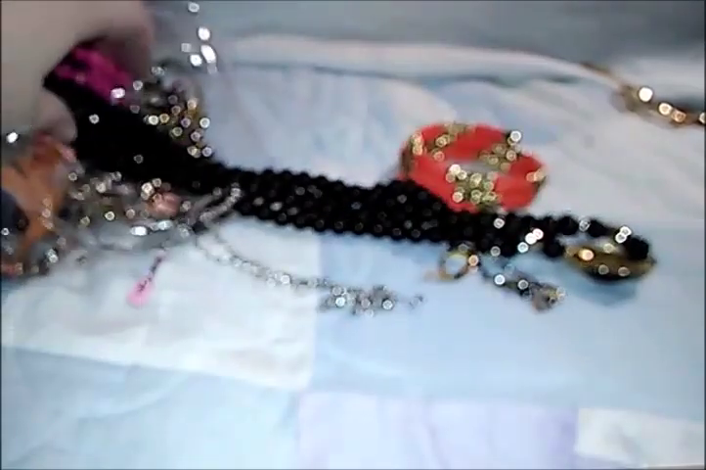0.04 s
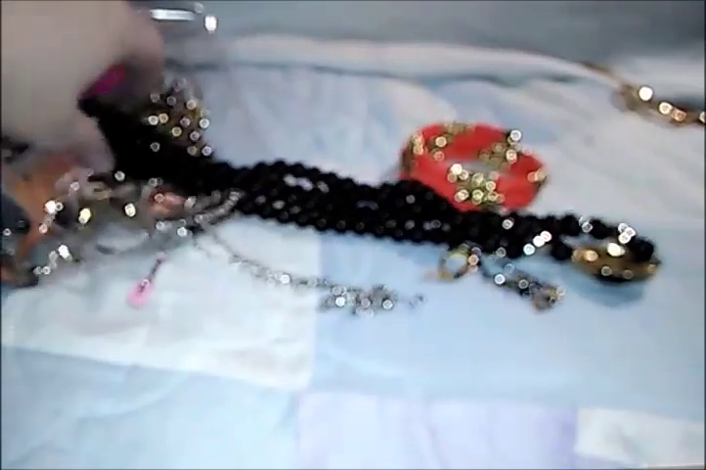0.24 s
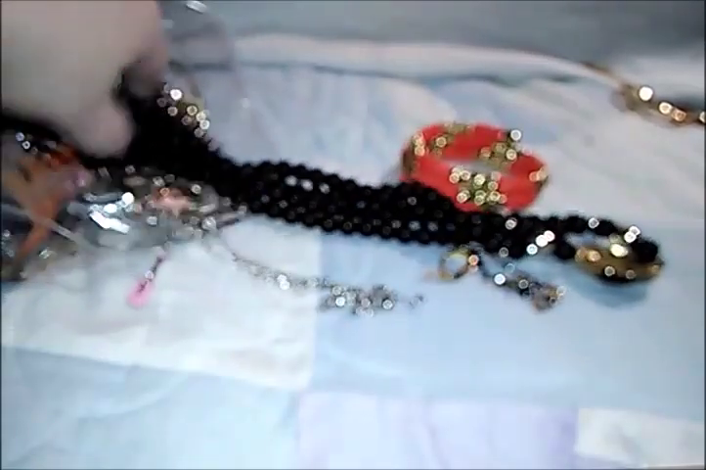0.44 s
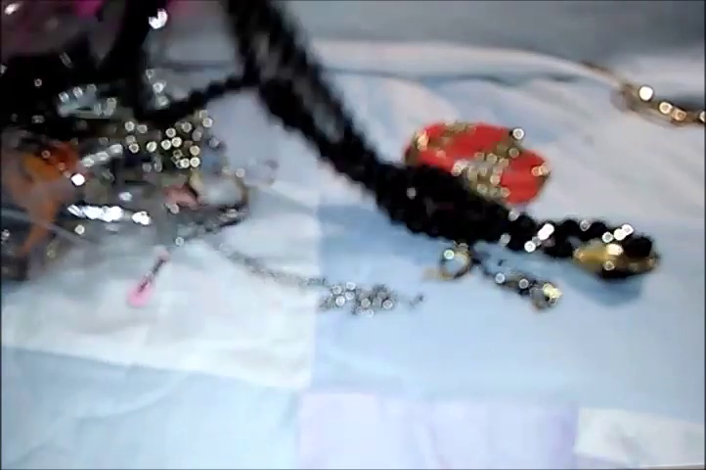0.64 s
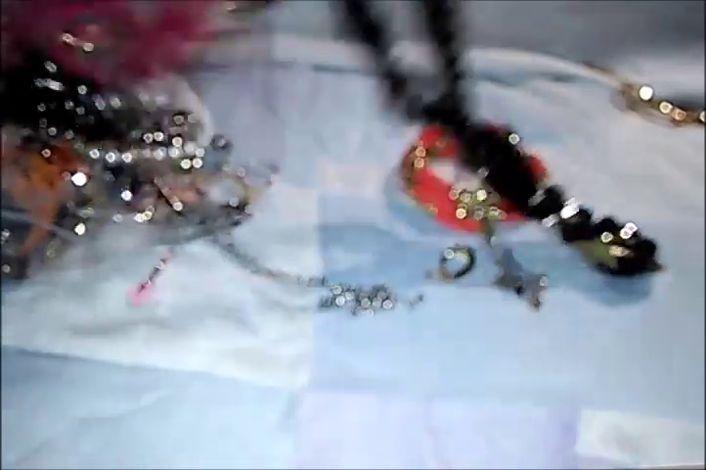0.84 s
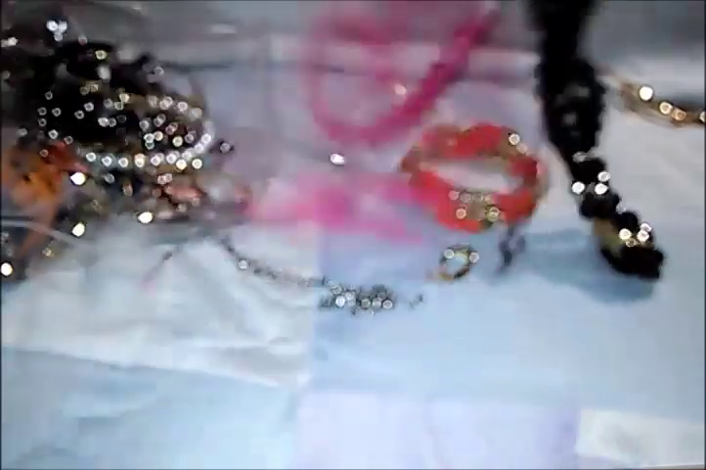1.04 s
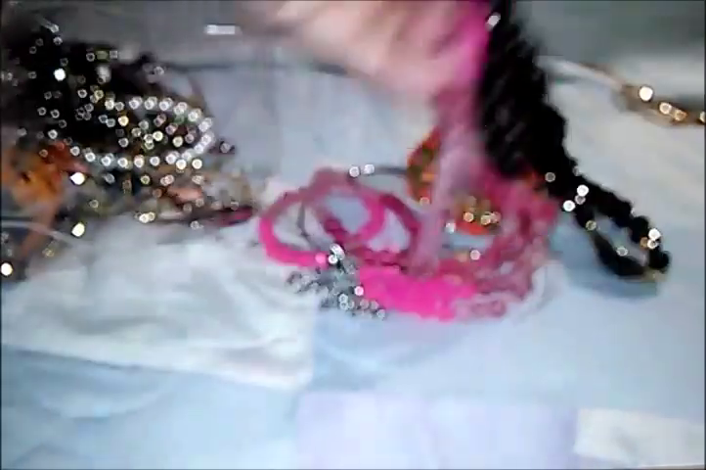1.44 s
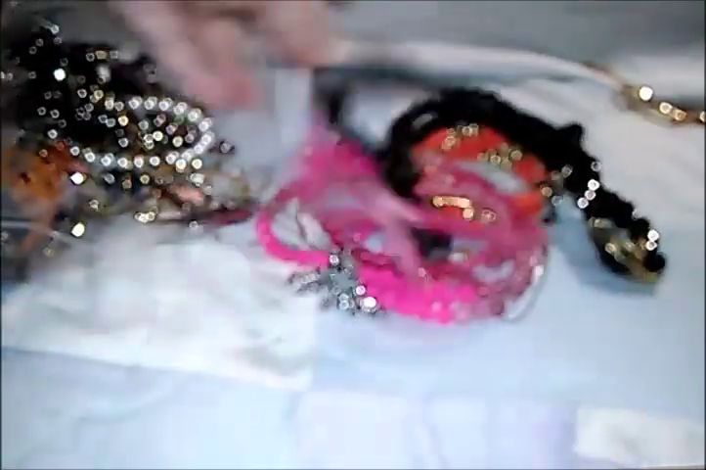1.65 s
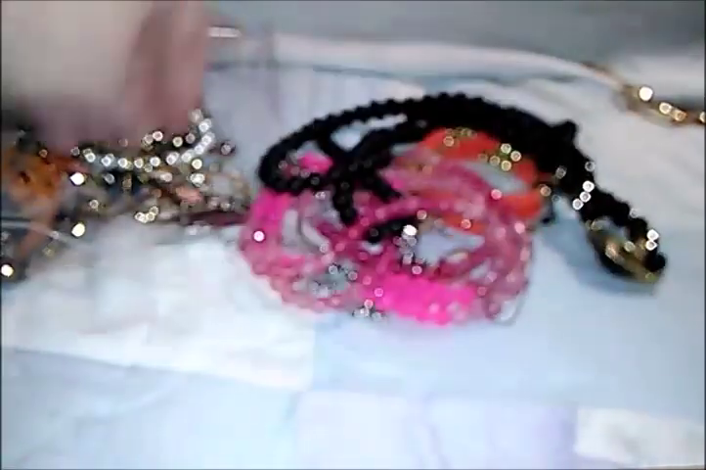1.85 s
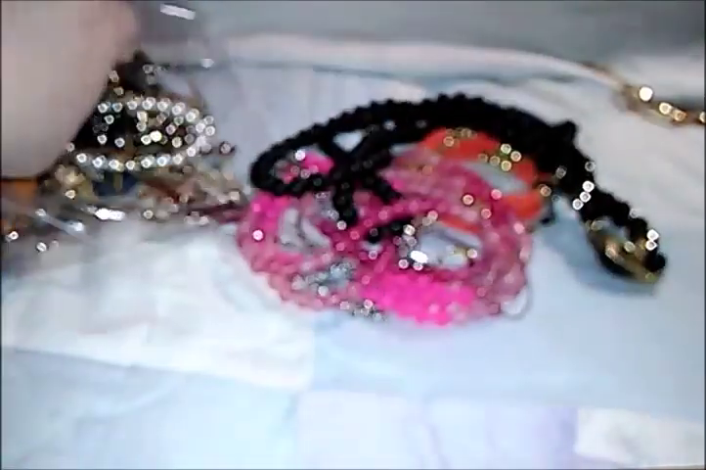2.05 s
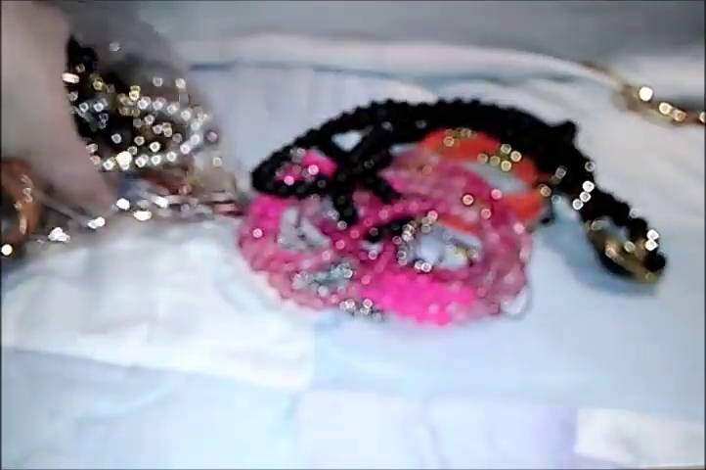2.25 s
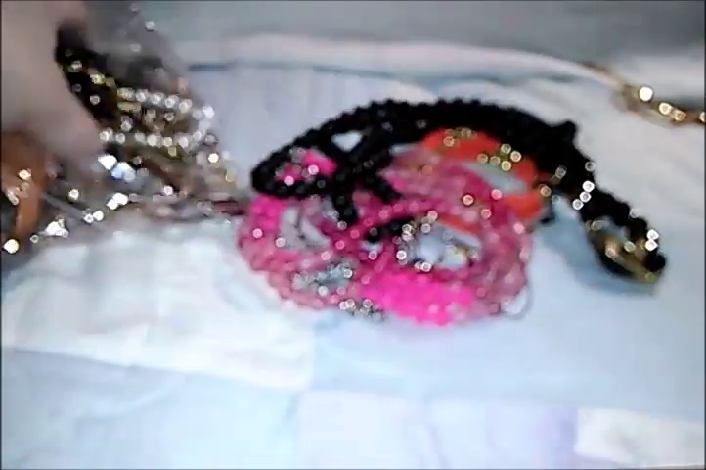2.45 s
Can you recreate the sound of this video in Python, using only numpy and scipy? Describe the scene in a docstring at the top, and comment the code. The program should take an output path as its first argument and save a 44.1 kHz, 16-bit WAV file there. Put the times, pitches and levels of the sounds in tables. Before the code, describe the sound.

Bead necklaces rattle brightly and close by, starting with a bangle clack and scraping over a pile and cloth. The rattle builds to its loudest near 0.9 seconds, then thins into single clicks and small metal pings. It swells again around 1.7 seconds and briefly drops. From about 1.8 to 2.2 seconds soft thumps sound as the strands settle, with rattling and clacks until 2.5 seconds. A faint room hum lies underneath.

```python
"""A bright rattle of beads, close by: necklaces and bracelets are dragged from a pile, lifted, and
lowered onto cloth. The rattle is thousands of tiny touches between beads, each ringing for an instant.
Single beads click, bangles clack and small metal parts ping. Underneath, the strands scrape over the
pile and the cloth, and the padded surface thumps softly, in a quiet room with a low hum."""
import sys
import numpy as np
from scipy import signal
from scipy.fft import rfft, irfft, next_fast_len
from scipy.io import wavfile

SR = 44100
rng = np.random.default_rng(int(sys.argv[2]) if len(sys.argv) > 2 else 0)


def persist_wave(psi):
    """Save psi, clipped to +-1, as 16-bit WAV."""
    counts = np.round(np.clip(psi, -1, 1) * 32767).astype(np.int16)
    wavfile.write(sys.argv[1], SR, np.atleast_2d(counts).T)


N = 110250  # 2.5 seconds


def undb(db):
    """Turn decibels (dB) into a number to multiply a sound by."""
    return 10 ** (np.asarray(db) / 20)


def curve(table, t):
    """Read a table at times t, joining its rows with straight lines."""
    return np.interp(t, *np.array(table).T)


def unit(x):
    """Scale a sound so that its average level (rms) is 1."""
    return x / np.sqrt(np.mean(x ** 2))


def colour(x, tone):
    """Make some pitches louder and others softer, following a table of Hz and dB."""
    size = next_fast_len(N + N // 4) * 2
    hz, db = np.array(tone).T
    freqs = np.maximum(np.fft.rfftfreq(size, 1 / SR), 1)
    gain = undb(np.interp(np.log(freqs), np.log(hz), db))
    # shape the filter so that it never rings before a hit
    cepstrum = irfft(np.log(gain))
    cepstrum[1:size // 2] *= 2
    cepstrum[size // 2 + 1:] = 0
    return irfft(rfft(x, size) * np.exp(rfft(cepstrum)))[:N]


def rings(times, sizes, hz, t60, samples):
    """Each touch starts a tone that dies away; t60 is the seconds it takes to fade by 60 dB."""
    age = np.arange(samples) / SR
    times, sizes, hz, t60 = (v[:, None] for v in np.broadcast_arrays(times, sizes, hz, t60))
    waves = sizes * np.cos(2 * np.pi * hz * age) * np.exp(-np.log(1000) * age / t60)
    waves[:, 0] *= .5
    positions = np.maximum(times * SR, 0).astype(int) + np.arange(samples)
    return np.bincount(positions.ravel(), waves.ravel(), N)[:N]


def contacts(per_s, scatter_db=5.5, count=26000):
    """Random touches: each gets a time, a size, a random number around 0 and another from 0 to 1."""
    even, normal = rng.random((count, 2)), rng.standard_normal((count, 2))
    n = int(min(per_s * N / SR, count))
    times = even[:n, 0] * N / SR
    sizes = undb(scatter_db * np.minimum(normal[:n, 0], 2))
    return times, sizes, normal[:n, 1], even[:n, 1]


def flurries(times, slips_per_s=55, fade_db=8.5, count=400):
    """Strands catch and slip: touches are strongest just after a slip and fade until the next."""
    slips = np.cumsum(rng.gamma(2, .5, count)) / slips_per_s
    progress = np.interp(times, slips, np.arange(count)) % 1
    return undb(-fade_db * progress)


# The room's hum. Each row: pitch in Hz, average level in dB.
HUM_TONES = [(76, -74.5), (227, -70.5)]
# A faint whir that fades and returns. Each row: time in seconds, level in dB.
WHIR_LEVEL = [(.4, -70.5), (1.1, -60.5), (1.25, -84), (1.55, -66.5), (1.75, -63.5)]
# The tone of the room's noise. Each row: frequency in Hz, relative level in dB.
ROOM_NOISE_TONE = [(20, -37), (38, -10.5), (76, 8.5), (100, -6.5), (230, -3), (320, -14.5), (700, -16.5),
                   (1800, -23.5), (14000, -25.5)]
def background(t, whir_hz=1356, whir_width_hz=240, noise_db=-57):
    """The quiet room: a low hum, a mid-pitched whir and a steady, deep noise."""
    hum = sum(np.sqrt(2) * undb(db) * np.sin(2 * np.pi * (hz * t + rng.random())) for hz, db in HUM_TONES)
    edges_hz = [whir_hz - whir_width_hz / 2, whir_hz + whir_width_hz / 2]
    band = signal.butter(2, edges_hz, "band", fs=SR, output="sos")
    whir = unit(signal.sosfilt(band, rng.standard_normal(N))) * undb(curve(WHIR_LEVEL, t))
    noise = unit(colour(rng.standard_normal(N), ROOM_NOISE_TONE)) * undb(noise_db)
    return noise + hum + whir


def reflections(x, t):
    """Add quick echoes from nearby things and a weaker, longer tail to a sound."""
    echoes = 0
    for t60, db in (0.031, -6), (0.065, -19.5):
        tail = rng.standard_normal(N) * np.exp(-np.log(1000) * t / t60)
        echoes = echoes + undb(db) * tail / np.linalg.norm(tail)
    return x + signal.fftconvolve(x, echoes)[:N]


# Soft bumps of handling. Each row: start in seconds, thud level in dB, thud pitch in Hz, ring level in dB.
SURFACE_BUMPS = [(1.772, -46.5, 205.5, -70), (1.971, -42.5, 218, -52), (2.07, -44.5, 164, -42.5),
                 (2.158, -43.5, 179, -43.5)]
def thumps(t, thud_t60=0.13, ring_hz=744, ring_t60=0.086):
    """The cloth-covered surface gives a dull, low thud, and the pile on it a short hollow ring."""
    out = 0
    for start, thud_db, thud_hz, ring_db in SURFACE_BUMPS:
        age = np.maximum(t - start, 0)
        for hz, db, t60 in (thud_hz, thud_db, thud_t60), (ring_hz, ring_db, ring_t60):
            out = out + undb(db) * np.sin(2 * np.pi * hz * age) * np.exp(-np.log(1000) * age / t60)
    return out


# How loud the strands scrape. Each row: time in seconds, level in dB.
SCRAPE_LEVEL = [(0, -46), (.15, -56), (.3, -57.5), (.365, -49), (.46, -58), (.6, -52), (.78, -52),
                (.85, -44), (.9, -52.5), (1.15, -58.5), (1.28, -93), (1.58, -74), (1.68, -61.5),
                (1.83, -58.5), (1.92, -66.5), (2.08, -51.5), (2.25, -47.5), (2.4, -56), (2.5, -49)]
# The scrape's dull tone. Each row: frequency in Hz, relative level in dB.
DULL_TONE = [(60, -7.5), (160, 3), (370, -5), (750, 2.5), (1100, -5), (2500, -4), (5000, -2.5),
             (9000, -29.5)]
def scrape(t):
    """Strands catch and slip on the pile and the cloth, making dull ticks that blur together."""
    times, sizes, push, _ = contacts(per_s=3000, scatter_db=6)
    kicks = sizes * np.sign(push) * flurries(times)
    ticks = np.bincount((times * SR).astype(int), kicks, N)
    return unit(colour(ticks, DULL_TONE)) * undb(curve(SCRAPE_LEVEL, t))


# Taps on metal. Each row: start in seconds, level in dB, pitch in Hz, seconds to fade by 60 dB.
METAL_TAPS = [(.907, -5, 11700, 0.0036), (1.0185, -17, 12050, 0.034), (1.043, -17, 12400, 0.026),
              (1.049, -22, 12980, 0.058), (1.1176, -7, 12440, 0.021), (1.157, -17.5, 9845, 0.059),
              (1.53, -23.5, 11130, 0.045), (1.533, -24.5, 7030, 0.029)]
def pings():
    """Small metal parts ring on after a touch."""
    times, db, hz, t60 = np.array(METAL_TAPS).T
    return rings(times, undb(db), hz, t60, samples=4000)


# Knocks in the pile. Each row: start in seconds, level of the first touch in dB, typical pitch in Hz.
BANGLE_KNOCKS = [(.0066, -16.5, 1600), (0.3541, -24.5, 3280), (0.7664, -34, 4205), (0.8546, -26, 3630),
                 (0.927, -30, 4380), (1.128, -34, 3900), (1.777, -30.5, 2280), (1.954, -33.5, 3060),
                 (2.0146, -34.5, 3960), (2.07, -21.5, 2550), (2.116, -31.5, 3800), (2.1584, -19, 5370),
                 (2.3091, -26.5, 4720), (2.4255, -24, 4860)]
def clacks(touches=6, gap_s=0.000606, drop_db=4.5, pitch_spread=0.26):
    """Larger pieces such as bangles chatter: a few very quick touches, each weaker than the last."""
    out, touch = 0, np.arange(touches)
    for start, db, hz in BANGLE_KNOCKS:
        times = start + gap_s * (touch + rng.random(touches) / 2)
        pitches = hz * np.exp(pitch_spread * rng.standard_normal(touches))
        out = out + rings(times, undb(db - drop_db * touch), pitches, t60=0.0031, samples=300)
    return out


# Hard hits between beads. Each row: start in seconds, relative level in dB.
BEAD_HITS = [(0.0482, -20), (.119, -23), (0.5485, -15.5), (.5601, -15), (.6343, -12.5), (0.7669, -10),
             (1.094, -17), (1.123, -15), (1.128, -13), (1.2133, -15), (1.225, -12.5), (1.2267, -5),
             (1.2382, -14), (1.296, -19), (1.344, -19.5), (1.3663, -24), (1.3708, -14.5), (1.4834, -16),
             (1.492, -15.5), (1.5956, -9.5), (1.6034, -17), (1.6207, -15), (1.6574, -8), (1.6646, -6),
             (1.68, -10), (1.7294, -11), (1.7756, -3.5), (1.7762, -6), (2.3496, -21.5)]
def clicks(hz=9730, pitch_spread=0.02, boost_db=2.5):
    """Single beads strike hard, each at a slightly different pitch, with the tone of the rattle below."""
    times, db = np.array(BEAD_HITS).T
    pitches = hz * np.exp(pitch_spread * rng.standard_normal(len(times)))
    hits = rings(times, undb(db + boost_db), pitches, t60=0.0022, samples=160)
    return colour(hits, BRIGHT_TONE)


def tinkles(t60=0.029, hz=12600, pitch_spread=0.057, boost_db=3.5):
    """Metal links ring among the small beads, following the level and small-bead share of the rattle."""
    times, sizes, detune, _ = contacts(per_s=70)
    sizes = sizes * undb(curve(RATTLE_LEVEL, times) + boost_db)
    sizes = sizes * np.sqrt(np.clip(curve(SMALL_BEAD_SHARE, times), 0, 1))
    return rings(times, sizes, hz * np.exp(pitch_spread * detune), t60, samples=1500)


# How loud the moving strands rattle. Each row: time in seconds, level in dB.
RATTLE_LEVEL = [(0, -43), (.05, -37.5), (.09, -51), (.12, -40.5), (.16, -56), (.197, -40.5), (.204, -33.5),
                (.24, -35), (.29, -48), (.335, -38), (.38, -41.5), (.425, -33.5), (.48, -41.5),
                (.535, -43.5), (.57, -29.5), (.615, -37.5), (.645, -31), (.67, -36), (.72, -29),
                (.78, -33.5), (.83, -26), (.9, -29), (.922, -21), (.955, -30.5), (1.015, -27.5),
                (1.075, -37.5), (1.135, -27.5), (1.2, -36), (1.23, -36), (1.275, -42.5), (1.34, -39.5),
                (1.4, -34.5), (1.48, -33.5), (1.515, -42), (1.54, -33), (1.575, -41), (1.635, -34),
                (1.658, -24), (1.71, -32.5), (1.73, -27.5), (1.775, -29), (1.815, -40), (1.835, -31.5),
                (1.92, -58), (1.965, -50.5), (1.976, -37.5), (2.015, -31), (2.07, -40.5), (2.16, -35),
                (2.24, -34.5), (2.33, -46), (2.355, -38), (2.405, -52.5), (2.5, -35.5)]
# Beads touch often when dragged, less when dangling. Each row: time in seconds, touches per second.
TOUCH_RATE = [(.95, 7400), (1.15, 1170), (1.33, 1000), (1.43, 2600), (1.6, 1200), (1.72, 9100)]
# How much of the rattle comes from small, higher beads. Each row: time in seconds, share from 0 to 1.
SMALL_BEAD_SHARE = [(.65, 0), (.85, 0.16), (1.08, 0.17), (1.2, 0), (1.9, .1), (2.0, 0.65), (2.22, 0)]
# The beads' bright tone. Each row: frequency in Hz, boost or cut in dB.
BRIGHT_TONE = [(300, -3), (2500, -1), (4500, 0), (7000, 2.5), (9700, 2.5), (11200, 1.5), (13000, 6),
               (14500, -17.5)]
SMALL_HZ, MEDIUM_HZ, LARGE_HZ = 11230, 9705, 6030
SMALL_SPREAD, MEDIUM_SPREAD, LARGE_SPREAD = 0.057, 0.02, 0.25  # pitch scatter: 0.02 is about 2 percent
def rattle(t, max_per_s=10000, large_share=.2, large_db=-11):
    """Beads of three sizes knock together along the moving strands; the large ones sound duller."""
    times, sizes, detune, pick = contacts(max_per_s)
    chance = np.clip(curve(TOUCH_RATE, times) / max_per_s, 1e-3, 1)
    heard = rng.random(len(times)) < chance
    small = pick < curve(SMALL_BEAD_SHARE, times)
    large = pick > 1 - large_share
    hz = MEDIUM_HZ * np.exp(MEDIUM_SPREAD * detune)
    hz = np.where(small, SMALL_HZ * np.exp(SMALL_SPREAD * detune), hz)
    hz = np.where(large, LARGE_HZ * np.exp(LARGE_SPREAD * detune), hz)
    sizes = sizes * undb(large_db * large) * flurries(times)
    sizes = sizes / np.sqrt(chance)  # the fewer the touches, the more each stands out
    beads = rings(times[heard], sizes[heard], hz[heard], t60=0.0019, samples=100)
    return unit(colour(beads, BRIGHT_TONE)) * undb(curve(RATTLE_LEVEL, t))


def scene():
    """Beads and metal with their echoes, over the dull cloth sounds and the quiet room."""
    t = np.arange(N) / SR
    jewellery = reflections(rattle(t) + tinkles() + clicks() + clacks() + pings(), t)
    return (jewellery + scrape(t) + thumps(t) + background(t))[None]


def record(dry):
    """Cut away the very highest treble, above 14650 Hz."""
    return signal.sosfilt(signal.ellip(8, .2, 70, 14650, fs=SR, output="sos"), dry)


dry = scene()
out = record(dry)
persist_wave(out)
```